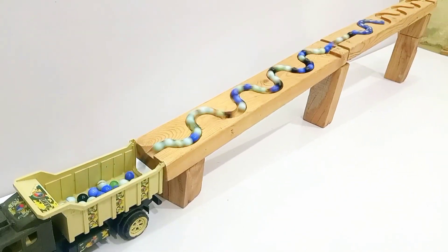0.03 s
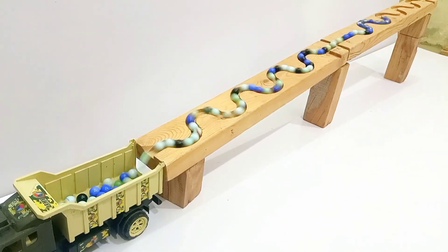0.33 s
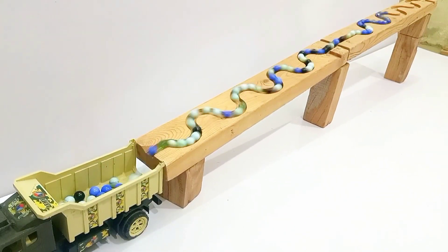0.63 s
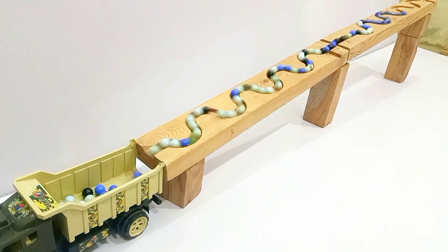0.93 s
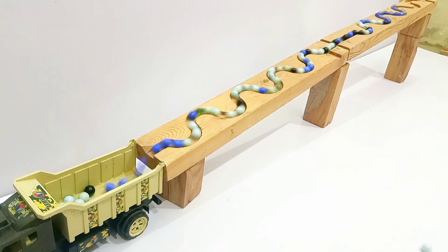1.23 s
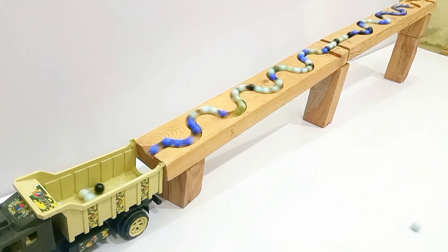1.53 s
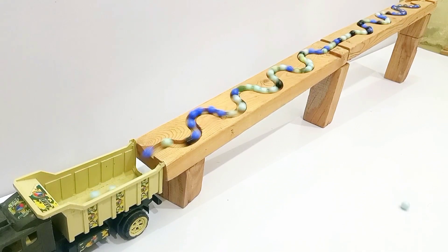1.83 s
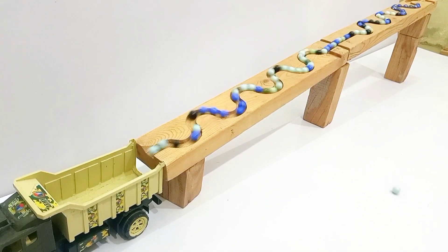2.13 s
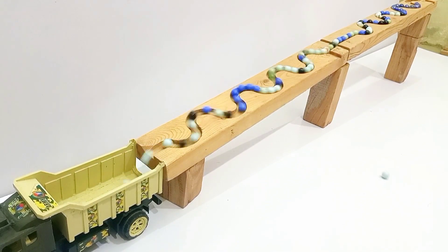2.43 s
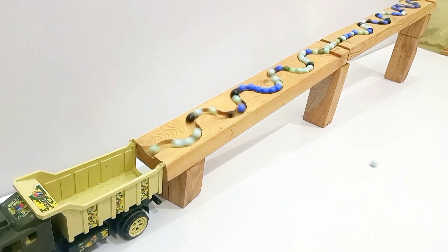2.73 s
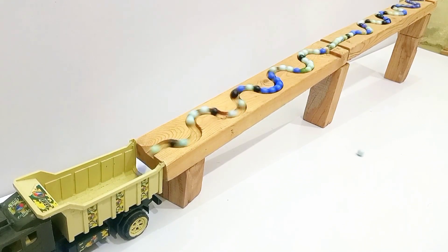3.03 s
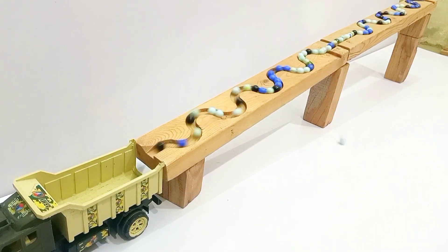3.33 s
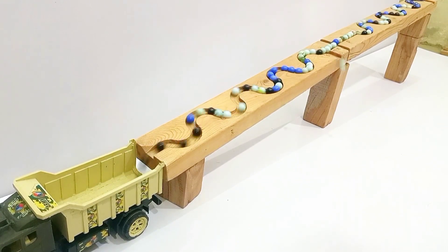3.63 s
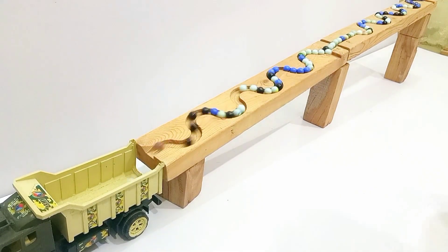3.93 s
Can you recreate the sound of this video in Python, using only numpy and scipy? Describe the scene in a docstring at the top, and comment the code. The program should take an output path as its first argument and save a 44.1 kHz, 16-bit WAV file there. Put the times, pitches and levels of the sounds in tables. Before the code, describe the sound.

Glass marbles rolling and clacking along a wooden track, played backwards.

```python
"""Short rumbles swell up to clacks and stop, about ten times a second: glass marbles on a winding
wooden track, played backwards, so that they seem to roll uphill. Glass bumping over wood grain makes
the rumble and a rattle that turns hissier late on; each clack is a marble striking the board.
Hollow knocks ring in between, over a thin roll from the far end of the track.
Now and then the groove hums; once, several marbles jostle."""
import sys
import numpy as np
from scipy import signal
from scipy.fft import rfft, irfft
from scipy.io import wavfile

SR = 44100
rng = np.random.default_rng(int(sys.argv[2]) if len(sys.argv) > 2 else 0)


def int16_out(signal):
    """Quantize to a 16-bit WAV file."""
    q = np.round(np.clip(np.atleast_2d(signal).T, -1, 1) * 32767)
    wavfile.write(sys.argv[1], SR, q.astype(np.int16))


N = 176400
TIME_S = np.arange(N) / SR

# marbles striking the board: time_s, clack_db, roll_length_s, rumble_db, rattle_db
STRIKES = [(0.0052, -22, 0.056, -39, -29), (0.087, -22, 0.071, -33.5, -35), (0.1959, -21, 0.056, -34, -33),
           (0.283, -22, 0.055, -33, -38.5), (0.414, -23.5, 0.065, -34, -37.5),
           (0.4687, -31.5, 0.023, -28, -33.5), (0.5326, -22.5, 0.2, -34.5, -44.5),
           (0.5674, -21.5, 0.046, -39, -35), (0.666, -23.5, 0.07, -30.5, -31.5),
           (0.757, -20.5, 0.047, -44, -41.5), (0.8628, -19.5, 0.094, -31, -34.5),
           (0.9545, -20.5, 0.067, -31, -34), (1.0442, -22, 0.076, -30, -34), (1.1442, -19, 0.074, -35, -37),
           (1.262, -19, 0.12, -30, -37.5), (1.3466, -20.5, 0.066, -29.5, -37.5),
           (1.4608, -18.5, 0.15, -33, -37.5), (1.5558, -20.5, 0.063, -32, -38.5),
           (1.7008, -19, 0.18, -34.5, -40), (1.7763, -19, 0.054, -35, -40.5),
           (1.8521, -23, 0.39, -34, -40.5), (1.8848, -20, 0.05, -29, -36), (1.9497, -21, 0.055, -31, -34),
           (2.0705, -17.5, 0.11, -31.5, -39.5), (2.1457, -22, 0.096, -30, -37),
           (2.3149, -19.5, 0.13, -31, -37), (2.407, -22.5, 0.065, -31.5, -39),
           (2.4462, -24, 0.091, -36.5, -39), (2.5441, -20, 0.072, -30.5, -35.5),
           (2.7245, -19, 0.14, -32, -35.5), (2.8271, -18.5, 0.069, -29, -36.5),
           (2.9291, -21.5, 0.073, -32, -37), (3.0032, -22.5, 0.089, -39.5, -48),
           (3.1064, -20, 0.1, -30.5, -38), (3.2434, -20.5, 0.2, -31, -41),
           (3.2736, -26, 0.0097, -27.5, -37), (3.2916, -24.5, 0.046, -31, -44.5),
           (3.3906, -23, 0.12, -30.5, -39.5), (3.4179, -21, 0.061, -28.5, -35),
           (3.5032, -25, 0.066, -28.5, -38.5), (3.6089, -28, 0.099, -32.5, -50),
           (3.71, -18.5, 0.082, -29, -40), (3.7853, -27.5, 0.065, -32, -44),
           (3.8807, -21, 0.081, -27.5, -42.5)]
# light bounces, no roll: time_s, level_db
LIGHT_BOUNCES = [(1.5886, -26.5), (2.0178, -28.5), (2.7131, -26), (3.149, -25.5), (3.5723, -29.5),
                 (3.7395, -28)]
# hollow knocks of the track: time_s, level_db
TRACK_KNOCKS = [(0.173, -29.5), (0.238, -29), (0.49, -28), (0.588, -27.5), (0.779, -31.5), (0.978, -23),
                (1.066, -26.5), (1.236, -26.5), (1.308, -21), (1.384, -20.5), (1.474, -27), (1.566, -22.5),
                (1.642, -23.5), (1.718, -27), (1.804, -26.5), (1.9, -27), (2.005, -25.5), (2.178, -24),
                (2.247, -22.5), (2.324, -24.5), (2.643, -28), (2.669, -25), (2.79, -29), (2.915, -24.5),
                (3.129, -22.5), (3.804, -23), (3.915, -32), (3.941, -33)]
# modes of a knock: pitch_hz, level_db, t60_s
TRACK_MODES = [(593.5, -14, 0.051), (985, -14, 0.06), (1858, -2, 0.047), (1867, -0.5, 0.027),
               (2747, -4, 0.013)]
# groove hums: centre_s, pitch_hz, level_db
GROOVE_HUMS = [(0.337, 890, -39), (0.416, 835, -37.5), (.51, 945, -41), (0.737, 845, -35.5),
               (2.435, 850, -38), (2.615, 1060, -43)]
# resonances of the board and of a glassy clack: centre_hz, width_hz, lift_db
BOARD_PEAKS = [(232, 12.4, 7), (354, 35, 2), (734, 27, 5.5), (826, 16, 4.5)]
CLACK_PEAKS = [(3026, 1060, 7), (6120, 510, 7)]
# spectral shapes: frequency_hz, level_db
RUMBLE_SPECTRUM = [(30, -64), (70, -49), (110, -20), (160, -11), (300, -8), (630, -6.5), (820, 0.5),
                   (1100, 2), (1600, -4.5), (2200, -9.5), (4000, -16.5), (9000, -67)]
RATTLE_SPECTRUM = [(100, -11.5), (1400, -1), (2200, -11.5), (2800, 2.5), (3500, 0), (4100, -4),
                   (5200, -4.5), (6000, 2.5), (6800, -9), (8400, -25.5), (10000, -24.5), (13600, -42),
                   (15200, -24)]
SIZZLE_SPECTRUM = [(900, -22), (2200, 6.5), (7000, 11.5), (11000, -6), (13500, -16), (15500, -10)]
FAR_SPECTRUM = [(40, -49), (200, -6), (600, -15.5), (870, 3), (1300, -9), (1650, -15.5), (1860, 20.5),
                (2150, -22), (2900, -9), (4200, -20), (7000, -13), (15000, -69)]
CLACK_SPECTRUM = [(50, -22.5), (150, 3), (300, 2.5), (600, -11.5), (1000, -9.5), (1800, 3), (2250, -12),
                  (2800, 3), (4000, -4.5), (5900, 0.5), (6700, -7), (8300, -5), (9200, -13), (13500, -26.5),
                  (15000, -15)]
ROOM_SPECTRUM = [(30, -24), (150, -3), (600, 13), (15000, -19)]
# envelopes of the far roll and of the rattle's hissing part: time_s, level_db
FAR_ENVELOPE = [(0, -44.5), (.2, -49), (.36, -41.5), (.69, -49.5), (.75, -36), (.88, -47), (1.7, -44),
                (2.4, -44), (2.74, -51), (3.1, -49), (3.3, -45), (3.52, -74), (3.86, -47), (3.9, -52),
                (4, -60)]
SIZZLE_ENVELOPE = [(0, -15), (2.85, -11.5), (3.1, -3.5), (3.4, 0.5), (3.85, 0.5)]

CLACK_DB, KNOCK_DB, RUMBLE_DB, RATTLE_DB, ROOM_DB = 16, -3, -5, -2.5, -64
ROLL_ONSET_S, ROLL_SHAPE, RIPPLE_DB = 0.0011, 2.15, 4.5
RUMBLE_BUMPS_PER_S, RATTLE_BUMPS_PER_S = 1400, 3500
THUD_DB, THUD_DECAY_S = -8.5, 0.0016  # board gives under each clack
BOOM_HZ, BOOM_RISE_HZ_PER_S, BOOM_WIDTH_HZ, BOOM_DB = 185, 70, 164, 5  # rises as the marbles move along
GLINTS_PER_S, GLINT_HZ, GLINT_DB, GLINT_T60_S = 150, 7545, -32, .009
CONTACT_DB, CONTACT_GAP_S = [-13, -5, -1, -8.5, -1.5], .00045


def from_db(db):
    """Decibels to gain."""
    return 10 ** (np.asarray(db) / 20)


def envelope(rows):
    """Gain per sample from time_s, level_db points."""
    return from_db(np.interp(TIME_S, *np.transpose(rows)))


def before(time_s):
    """Slice of up to 0.5 s ending at time_s."""
    end = int(time_s * SR)
    return slice(max(end - SR // 2, 0), end)


def clicks_at(times_s, gains):
    """Impulse train."""
    out = np.zeros(N)
    np.add.at(out, np.clip((times_s * SR).astype(int), 0, N - 1), gains)
    return out


def bumps(per_s, spread_db):
    """Tiny random contacts of uneven size; rms 1."""
    sizes = from_db(spread_db * np.minimum(rng.exponential(1, N), 4))
    x = sizes * rng.choice([-1, 1], N) * (rng.random(N) < per_s / SR)
    return x / x.std()


def shifted(peaks, spread):
    """Resonances at another spot on the board: each detuned by a random fraction."""
    return [(hz * (1 + spread * rng.standard_normal()), width_hz, db) for hz, width_hz, db in peaks]


def body(x, spectrum, peaks=(), ripple_db=0, ripple_points=150):
    """Unit-power minimum-phase filter, run backwards; random ripple stands for one spot on the board."""
    size = 8192
    hz = np.maximum(np.arange(size // 2 + 1) * SR / size, 1)
    points = np.array(spectrum)
    db = np.interp(np.log(hz), np.log(points[:, 0]), points[:, 1])
    ripple = rng.standard_normal(ripple_points)
    db += ripple_db * np.interp(np.sqrt(hz / hz[-1]), np.linspace(0, 1, ripple_points), ripple)
    for centre_hz, width_hz, lift_db in peaks:
        db += lift_db / (1 + (2 * (hz - centre_hz) / width_hz) ** 2)
    cepstrum = irfft(np.log(from_db(db)))
    response = irfft(np.exp(rfft(2 * cepstrum[:size // 2], size)))
    return signal.fftconvolve(x[::-1], response / np.linalg.norm(response))[:len(x)][::-1]


def ring(clicks, hz, t60_s):
    """One mode, run backwards: swells up to each click."""
    radius, angle = from_db(-60 / (t60_s * SR)), 2 * np.pi * hz / SR
    feedback = [1, -2 * radius * np.cos(angle), radius * radius]
    return signal.lfilter([0, np.sin(angle)], feedback, clicks[::-1] + 1e-18)[::-1]


def soft_ring(clicks, hz, t60_s, contact_t60_s):
    """Softly struck mode: a second, short resonance rounds the contact."""
    return 2 * np.log(1000) / (contact_t60_s * SR) * ring(ring(clicks, hz, t60_s), hz, contact_t60_s)


def rolling():
    """Glass on wood grain: each marble's rumble and rattle swell towards the thud of its clack."""
    out, sizzle_gain = np.zeros(N), envelope(SIZZLE_ENVELOPE)
    wood = bumps(RUMBLE_BUMPS_PER_S, spread_db=3.5)
    glass = bumps(RATTLE_BUMPS_PER_S, spread_db=5.5)
    grit = bumps(RATTLE_BUMPS_PER_S, spread_db=4)
    for time_s, clack_db, length_s, rumble_db, rattle_db in STRIKES:
        span = before(time_s)
        lead_s = time_s - TIME_S[span]
        power = 10 ** -np.minimum((lead_s / length_s) ** ROLL_SHAPE, 10)
        swell = np.sqrt(np.minimum(lead_s / ROLL_ONSET_S, 1) * power)
        thud_gain = from_db(clack_db + THUD_DB) * np.exp(-lead_s / THUD_DECAY_S)
        rumble_gain = swell * from_db(rumble_db + RUMBLE_DB) + thud_gain
        rattle_gain = swell * from_db(rattle_db + RATTLE_DB)
        boom = (BOOM_HZ + BOOM_RISE_HZ_PER_S * time_s, BOOM_WIDTH_HZ, BOOM_DB)
        peaks = [*shifted(BOARD_PEAKS, spread=.035), boom]
        rattle = rattle_gain * (1 - sizzle_gain[span] / 2) * glass[span]
        sizzle = rattle_gain * sizzle_gain[span] * grit[span]
        out[span] += body(rumble_gain * wood[span], RUMBLE_SPECTRUM, peaks, RIPPLE_DB)
        out[span] += body(rattle, RATTLE_SPECTRUM, ripple_db=RIPPLE_DB)
        out[span] += body(sizzle, SIZZLE_SPECTRUM, ripple_db=RIPPLE_DB / 2)
        out[span] += glints(rattle_gain)
    return out


def glints(rattle_gain, count=3, spread=.14):
    """Neighbouring marbles touch: tiny glassy pings, at new pitches for each roll."""
    out = np.zeros(len(rattle_gain))
    for hz in GLINT_HZ * np.exp(spread * np.clip(rng.standard_normal(count), -2, 2)):
        touches = rng.random(len(rattle_gain)) < GLINTS_PER_S / SR
        out += soft_ring(rattle_gain * touches, hz, GLINT_T60_S, GLINT_T60_S / 10)
    return from_db(GLINT_DB) * np.sqrt(SR / GLINTS_PER_S) * out


def far_rolling():
    """Distant marbles merge into one thin roll, coloured by the board."""
    contacts = envelope(FAR_ENVELOPE) * bumps(RUMBLE_BUMPS_PER_S, spread_db=2)
    return body(contacts, FAR_SPECTRUM, BOARD_PEAKS)


def clacks():
    """Each strike or bounce: five quick contacts, coloured by the spot they hit."""
    out = np.zeros(N)
    for time_s, level_db, *_ in [*STRIKES, *LIGHT_BOUNCES]:
        span = before(time_s)
        gaps_s = CONTACT_GAP_S * rng.uniform(.5, 1.4, len(CONTACT_DB))
        contact_s = time_s - np.cumsum(gaps_s) + gaps_s[0] + gaps_s[1] / 2
        signs = (-1) ** np.arange(len(gaps_s))
        contacts = clicks_at(contact_s, signs * from_db(CONTACT_DB))
        peaks = shifted(CLACK_PEAKS, spread=.07)
        hit = body(contacts[span], CLACK_SPECTRUM, peaks, RIPPLE_DB, ripple_points=70)
        out[span] += from_db(level_db + CLACK_DB) * hit / np.linalg.norm(hit)
    return out


def taps(per_s=75, level_db=-49, spread_db=6.3):
    """Impulses of faint random collisions; strength follows the far roll."""
    activity = envelope(FAR_ENVELOPE)
    hits = rng.random(N) < per_s / SR
    gains = from_db(level_db + spread_db * np.clip(rng.standard_normal(N), -2, 2))
    return hits * gains * activity / activity.mean()


def knocks():
    """Knocks and faint taps softly strike the same hollow modes of the track."""
    times_s, levels_db = np.transpose(TRACK_KNOCKS)
    out, faint_taps = np.zeros(N), taps()
    for hz, mode_db, t60_s in TRACK_MODES:
        gains = from_db(levels_db + KNOCK_DB + rng.standard_normal(len(times_s)))
        hits = faint_taps + clicks_at(times_s, gains)
        out += from_db(mode_db) * soft_ring(hits, hz, t60_s, contact_t60_s=0.011)
    return out


def hums(width_hz=25, half_length_s=0.016):
    """A rolling marble briefly excites one narrow resonance of the groove."""
    out, t60_s = np.zeros(N), np.log(1000) / np.pi / width_hz
    for centre_s, hz, level_db in GROOVE_HUMS:
        swell = np.exp(-((TIME_S - centre_s) / half_length_s) ** 2)
        tone = swell * ring(np.diff(rng.standard_normal(N + 1)), hz, t60_s)
        out += from_db(level_db) * tone * np.linalg.norm(swell) / np.linalg.norm(tone)
    return out


def jostle(centre_s=2.632, half_length_s=.009, level_db=-36):
    """Several marbles collide in one glassy cluster."""
    swell = np.exp(-((TIME_S - centre_s) / half_length_s) ** 2)
    cluster = from_db(level_db) * swell * bumps(RUMBLE_BUMPS_PER_S, spread_db=0)
    return body(cluster, SIZZLE_SPECTRUM, peaks=[(7040, 1200, 11)])


def room(x, echo_lead_s=.0218, echo_db=-20, trail_decay_s=0.0049, trail_db=-15):
    """Wall echo ahead of the reversed sound, a short smear behind it, quiet room noise."""
    echo = from_db(echo_db) * np.pad(x, (0, int(echo_lead_s * SR)))[-N:]
    smear = (rng.standard_normal(N) * np.exp(-TIME_S / trail_decay_s))[:SR // 10]
    trail = from_db(trail_db) * signal.fftconvolve(x, smear / np.linalg.norm(smear))[:N]
    noise = from_db(ROOM_DB) * body(rng.standard_normal(N), ROOM_SPECTRUM)
    return x + echo + trail + noise


def scene():
    """The marble run in its room, mono."""
    return room(clacks() + rolling() + far_rolling() + hums() + jostle() + knocks())[None]


def record(dry, peak_limit=.24, low_cut_hz=67, stopband_hz=16300):
    """Soft peak limit, gentle bass cut, steep top cut."""
    rounded = dry / (1 + (dry / peak_limit) ** 4) ** .25
    thinned = signal.sosfiltfilt(signal.butter(1, low_cut_hz, "high", fs=SR, output="sos"), rounded)
    return signal.sosfiltfilt(signal.cheby2(16, 50, stopband_hz, fs=SR, output="sos"), thinned)


dry = scene()
out = record(dry)
int16_out(out)
```